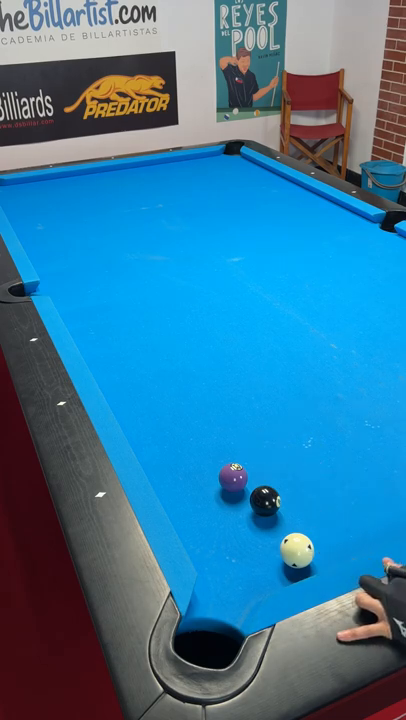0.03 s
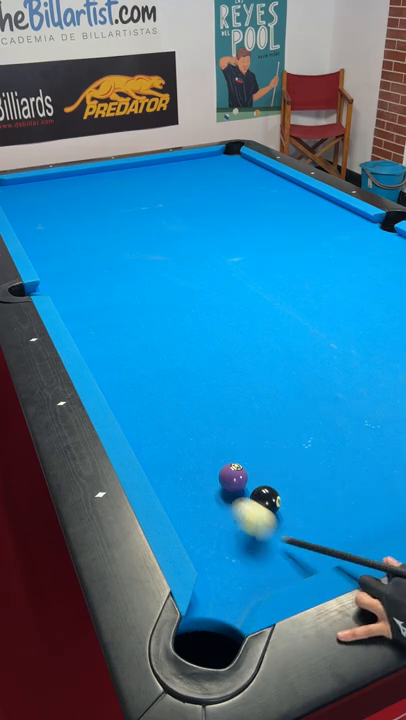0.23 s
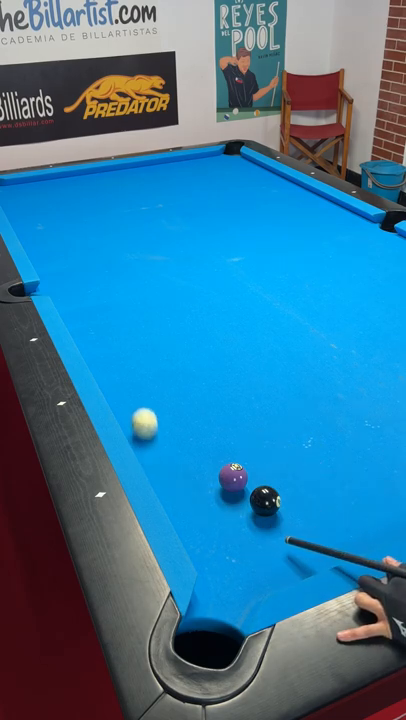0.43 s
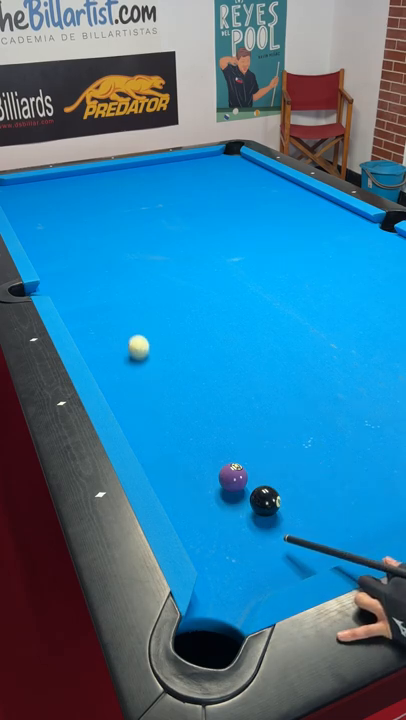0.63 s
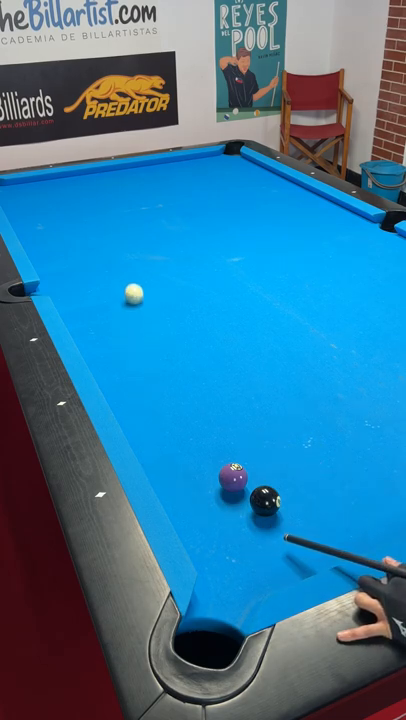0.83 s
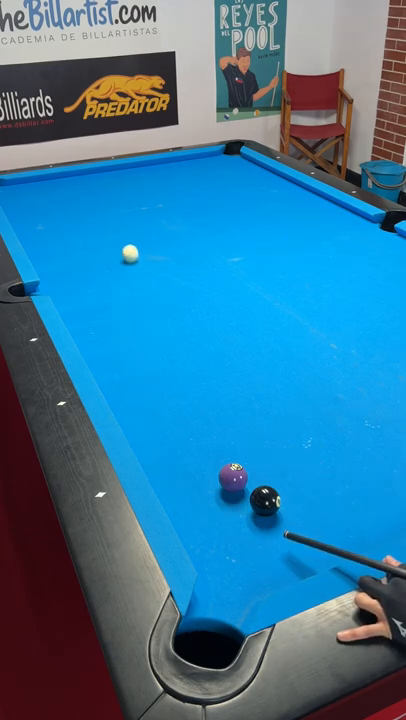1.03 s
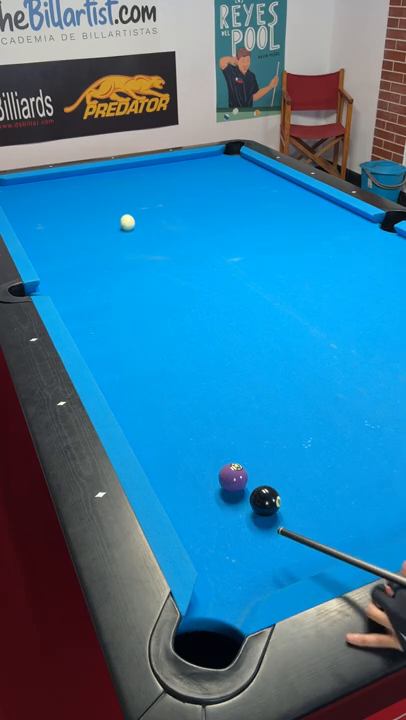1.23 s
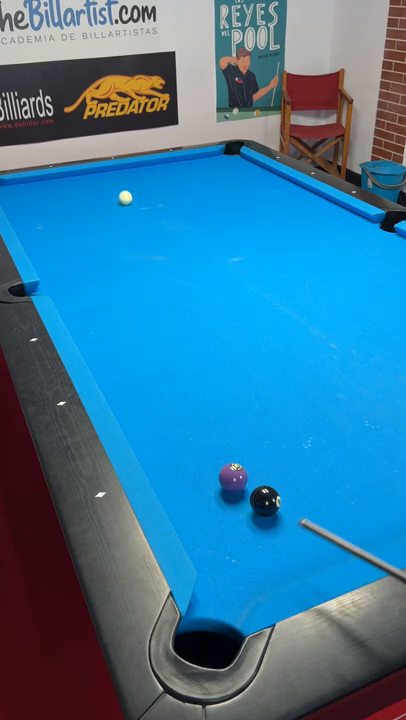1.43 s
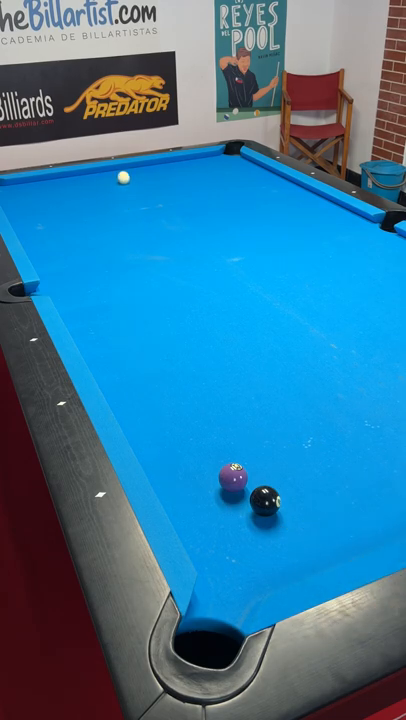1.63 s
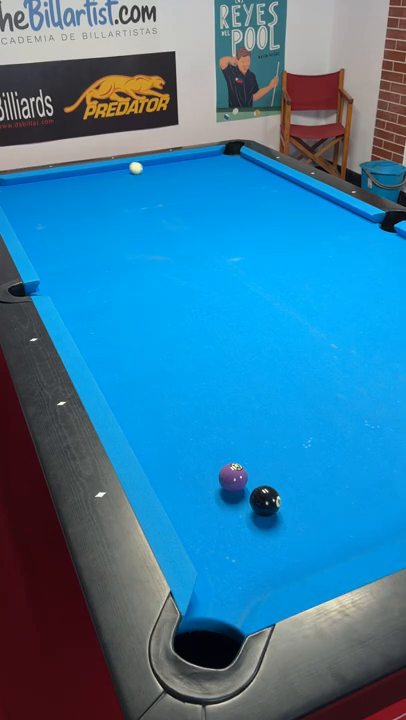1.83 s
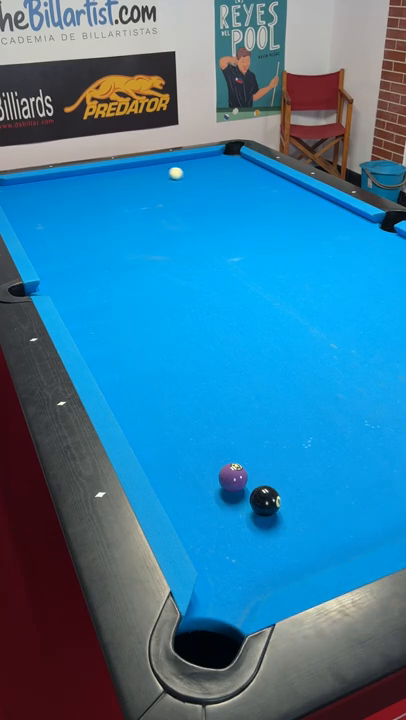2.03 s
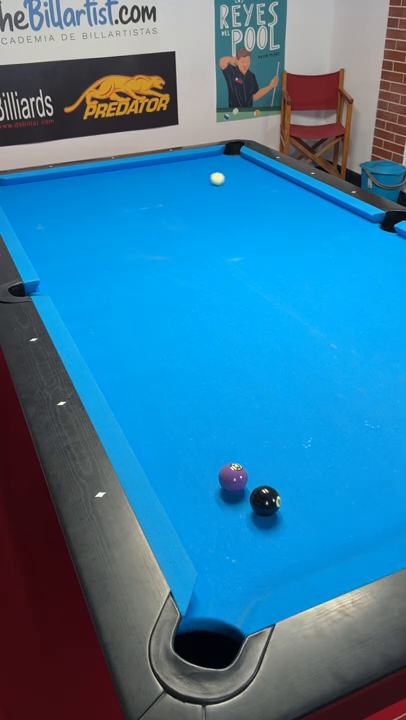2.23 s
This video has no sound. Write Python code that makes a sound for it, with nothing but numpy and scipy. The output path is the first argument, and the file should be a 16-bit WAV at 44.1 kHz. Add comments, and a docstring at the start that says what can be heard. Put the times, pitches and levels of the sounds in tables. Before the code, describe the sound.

A cue cracks sharply on a pool ball at about 0.25 seconds, ringing briefly in a small, quiet hall. The ball hops with quick, fading dull knocks until 0.6 seconds, then rolls with a low rumble. It thuds softly into far cushions at about 1.3 and 1.8 seconds. From around 1.1 seconds come a few small ticks, a faint sleeve rustle and the cue sliding back.

```python
"""A sleeve rustles faintly, then a cue cracks down on a ball: a jump shot at a pool table in a small hall.
The ball lands, hops on the ringing slate and rumbles over the cloth to thud softly into two far cushions.
Meanwhile the player draws the cue back with a rustle, a slide of the shaft and a few small ticks.
Heard from one microphone position, with a near echo, a short hall tail and quiet room air."""
import sys
import numpy as np
from scipy import signal
from scipy.fft import rfft, irfft, next_fast_len
from scipy.io import wavfile
from scipy.ndimage import map_coordinates

SR = 44100
rng = np.random.default_rng(int(sys.argv[2]) if len(sys.argv) > 2 else 0)


def put_to_file(sound):
    """Save the sound as 16-bit audio at rate SR, in the file named by the first command-line argument."""
    columns = np.atleast_2d(sound).T  # one column per channel
    safe = np.clip(columns, -1, 1)
    whole_steps = np.round(safe * 32767)
    wavfile.write(sys.argv[1], SR, whole_steps.astype(np.int16))


N = 101429
T = np.arange(N) / SR
STRIKE_S = .2418
RING_SAMPLES = 32768
# modes of cue and ball (frequency [Hz], level [dB], t60 [s])
CUE_MODES = [(385.9, -30.5, .15), (584.9, -18.5, 0.14), (809.84, -19, .27), (1013.6, -10, 0.066),
             (1203.6, -20, .15), (1307.8, -27.5, .12), (1490, -29.5, .08), (1780, -17, 0.057),
             (1950, -37.5, .08), (2259.3, -21, .065), (2923.2, -17.5, 0.031), (3535, -32.5, .04),
             (3938.6, -27.5, 0.049), (4570, -38, 0.031), (5127.4, -37, 0.058)]


def amp(db):
    """Decibels to gain."""
    return 10 ** (np.asarray(db) / 20)


def unit(x):
    """Scale to rms 1."""
    return x / np.sqrt(np.mean(x ** 2) + 1e-20)


def along(points, hz):
    """Read (frequency [Hz], value) points on a log frequency axis."""
    freqs, values = np.transpose(points)
    return np.interp(np.log(hz + 1), np.log(freqs + 1), values)


def level(points):
    """Gain along a (time [s], level [dB]) curve."""
    return amp(np.interp(T, *np.transpose(points)))


def wobble(per_s):
    """A smooth curve through per_s random values a second."""
    knots = rng.standard_normal(int(N * per_s / SR) + 4)
    return map_coordinates(knots, [T * per_s / SR], mode="nearest")


def filtered(x, gain):
    """Filter x by a gain over frequency."""
    size = next_fast_len(N + 8192)
    return irfft(rfft(x, size) * gain(np.fft.rfftfreq(size, 1 / SR)), size)[:N]


def noise(gain):
    """Coloured noise of rms 1."""
    return unit(filtered(rng.standard_normal(N), gain))


def rush(spectrum):
    """Noise of rms 1 shaped by (frequency [Hz], level [dB]) points."""
    return noise(lambda hz: amp(along(spectrum, hz)))


def fade(t60, t=T):
    """Exponential decay, 60 dB in t60 seconds."""
    return np.exp(-np.log(1000) * t / np.maximum(t60, 1e-4))


def fade_by_band(x, t60s):
    """Each frequency of x dies at its own speed."""
    hz, t, bands = signal.stft(x, SR, nperseg=512)
    return signal.istft(bands * fade(along(t60s, hz)[:, None], t), SR, nperseg=512)[1][:N]


def rise(seconds):
    """Soft onset with this time constant."""
    return 1 - np.exp(-T / max(seconds, 1e-5))


def at(s, x):
    """Delay x by s seconds."""
    return np.pad(x, (max(round(s * SR), 0), 0))[:N]


def ring(modes, scatter_db, swell_cycles=1.2):
    """Damped modes that take a moment to build up, a little different at each blow."""
    t = T[:RING_SAMPLES]
    out = np.zeros(N)
    for k, (hz, db, t60) in enumerate(modes):
        gain = (-1) ** k * amp(db + scatter_db * rng.standard_normal())
        swell = 1 - np.exp(-t * hz / swell_cycles)
        out[:RING_SAMPLES] += gain * swell * fade(t60, t) * np.sin(2 * np.pi * hz * t)
    return out


def room_air():
    """The quiet, steady air of the hall."""
    # room tone (frequency [Hz], level [dB])
    spectrum = [(25, 0), (70, -1.5), (180, -7.5), (500, -11.5), (1000, -19), (2000, -23.5), (6000, -25.5),
                (15500, -30.5)]
    return amp(-73.5) * rush(spectrum)


def sleeve_and_glove():
    """Sleeve and glove rustle with the stroke and as the player stands up."""
    # movement of each fabric (time [s], level [dB])
    sleeve_levels = [(0, -85), (.13, -90), (.19, -72), (.25, -74), (.6, -100), (1.0, -91), (1.19, -76.5),
                     (1.28, -78.5), (1.4, -78.5), (1.52, -75.5), (1.58, -76), (1.66, -74), (1.76, -75.5),
                     (1.95, -82), (2.3, -86.5)]
    glove_levels = [(.9, -100), (1.2, -86.5), (1.42, -84), (1.55, -80), (1.66, -83.5), (1.78, -97),
                    (2.1, -96.5)]
    # soft cloth and the glove's brighter swish (frequency [Hz], level [dB])
    cloth = [(100, -9.5), (500, -1.5), (1400, 0), (2500, -4.5), (6000, -7.5), (12000, -14), (16000, -15)]
    swish = [(1500, -28), (4000, -5), (7000, 0), (12500, -0.5), (16000, -8)]
    return sum(level(curve) * amp(1.5 * wobble(per_s=30)) * rush(colour)
               for curve, colour in [(sleeve_levels, cloth), (glove_levels, swish)])


def cue_strike():
    """The hard tip cracks on the ball; cue and table ring."""
    # crack of the tip and the table's shaken wooden body (frequency [Hz], level [dB])
    crack_spectrum = [(40, -15.5), (150, -9), (500, -4.5), (1200, 0.5), (3000, -3.5), (4500, -12),
                      (6500, -26), (10000, -33.5), (15000, -37)]
    wood_spectrum = [(40, -15.5), (150, 1.5), (230, -5.5), (330, -3.5), (650, 2.5), (880, -4.5), (1150, 2),
                     (1400, -4), (1700, -14), (3000, -22.5), (5000, -36), (7000, -49), (15000, -54.5)]
    crack = amp(-17.5) * rush(crack_spectrum) * fade(t60=.025)
    wood = amp(-23) * rush(wood_spectrum) * fade(t60=.3676) * rise(.0021)
    return at(STRIKE_S, (ring(CUE_MODES, scatter_db=1.59) + crack + wood) * rise(.0004))


def rolling():
    """The moving ball makes the slate rumble and drone at its lowest mode."""
    # rumble of the roll, and the drone, loudest during the hops (time [s], level [dB])
    rumble_levels = [(.25, -90.5), (.5, -58), (.7, -58), (.9, -64.5), (1.25, -64.5), (1.7, -65.5),
                     (2.05, -64), (2.3, -69)]
    drone_levels = [(.24, -73), (.26, -52.5), (.30, -44.5), (.34, -47), (.5, -44), (.57, -52), (.615, -66),
                    (1.05, -66), (1.6, -72.5), (2.05, -61.5), (2.3, -72)]
    # ball rolling on cloth over slate (frequency [Hz], level [dB])
    rumble_spectrum = [(25, -14), (50, -10), (80, 0), (100, -12.5), (140, -1.5), (220, -10.5), (320, -17.5),
                       (500, -27.5), (900, -44), (3000, -67.5)]
    drone_hz, wander_rad, waver_db = 72.26, .55, 3
    phase = 2 * np.pi * drone_hz * T + wander_rad * wobble(per_s=7)
    drone = level(drone_levels) * unit(np.sin(phase)) * amp(waver_db * wobble(per_s=9))
    rumble = level(rumble_levels) * rush(rumble_spectrum)
    return (rumble + drone) * (T > STRIKE_S)


def knock(blow_db):
    """Dull knock of ball on cloth; a weaker blow has less treble."""
    # contact noise (frequency [Hz], level [dB])
    spectrum = [(40, -17.5), (120, -4.5), (250, -6), (500, 3.5), (900, -6), (1500, -11.5), (2200, -29),
                (5000, -47), (12000, -70.5)]
    contact_hz, db_per_octave = 1700, 4
    hz = np.fft.rfftfreq(RING_SAMPLES, 1 / SR)
    cutoff_hz = contact_hz * 2 ** (blow_db / db_per_octave)
    lowpass = 1 / np.sqrt(1 + (hz / cutoff_hz) ** 4)
    burst = unit(irfft(rfft(rng.standard_normal(RING_SAMPLES)) * amp(along(spectrum, hz)) * lowpass))
    return amp(-31) * np.pad(burst, (0, N - RING_SAMPLES)) * fade(t60=.14)


def hops():
    """The ball is driven into the slate, lands and hops until it settles."""
    # the ball meets the slate (time [s], level [dB])
    landings = [(.246, 5.5), (.297, -10), (.342, 2.5), (.374, -0.5), (.402, -3), (.449, -5), (.488, -8.5),
                (.515, -12.5), (.562, -15.5)]
    # modes of the slate bed (frequency [Hz], level [dB], t60 [s])
    slate_modes = [(209.06, -39, 0.22), (235.8, -41.5, .46), (310.7, -40, .28), (331.89, -41, .28),
                   (456.5, -43, 0.43), (564, -42, 0.21), (643, -45.5, 0.22)]
    onset = rise(.0034)
    return sum(at(s, amp(db) * onset * (ring(slate_modes, scatter_db=4) + knock(db)))
               for s, db in landings)


def ticks():
    """A bright tick of the ball hitting the slate, then small ticks and scuffs of handling the cue."""
    # ticks and scuffs (time [s], level [dB], centre [Hz], width [octaves], t60 [s])
    contacts = [(.2562, -47.5, 6600, .7, .008), (1.1002, -48.5, 11480, 0.206, 0.0037),
                (1.178, -71.5, 2700, .6, 0.094), (1.199, -58.5, 6680, 0.37, 0.0057),
                (1.199, -54, 464, 0.93, 0.0256), (1.797, -57, 1001, 0.733, 0.021)]
    out = np.zeros(N)
    for s, db, centre_hz, width, t60 in contacts:
        band = noise(lambda hz: np.exp(-.5 * (np.log2((hz + 1) / centre_hz) / width) ** 2))
        out += at(s, amp(db) * fade(t60) * band)
    return out


def cue_slide(width_hz=64, dull_hz=1605.7):
    """Friction on the shaft stirs the cue's lower modes."""
    # the shaft slides back over the bridge hand (time [s], level [dB])
    slide_levels = [(1.0, -100), (1.4, -88), (1.51, -75.5), (1.64, -82.5), (1.74, -81.5), (1.95, -93)]

    def shaft(hz):
        peaks = sum(amp(db / 2) / (1 + (2 * (hz - mode_hz) / width_hz) ** 2)
                    for mode_hz, db, _ in CUE_MODES)
        return peaks / (1 + (hz / dull_hz) ** 2)
    return level(slide_levels) * noise(shaft)


def cushions():
    """Far rubber gives softly; table and hall boom, the bass longest; a duller bump follows."""
    # the ball meets a cushion (time [s], level [dB], rise [s], dull above [Hz])
    hits = [(1.291, -41, 0.0415, 387), (1.830, -42, 0.0079, 524.5)]
    # colour of the boom (frequency [Hz], level [dB])
    spectrum = [(30, -23), (60, -11), (85, 3.5), (140, 0), (300, 1.5), (450, 1), (900, -5.5), (2000, 10)]
    # decay of the boom (frequency [Hz], t60 [s])
    decay = [(80, 0.98), (200, 0.647), (400, 0.3655), (1000, 0.23)]

    def boom(dull_hz):
        return noise(lambda hz: amp(along(spectrum, hz)) / np.sqrt(1 + (hz / dull_hz) ** 8))
    out = np.zeros(N)
    for s, db, rise_s, dull_hz in hits:
        out += at(s, amp(db) * rise(rise_s) * fade_by_band(boom(dull_hz), decay))
        # the rebounding ball settles back on the slate
        out += at(s + .1, amp(db - 8) * rise(.0214) * fade(t60=.285) * boom(dull_hz=275.7))
    return out


def hall(x):
    """What the small hall returns to the microphone: an echo off a near surface and a diffuse tail."""
    # reverberation time (frequency [Hz], t60 [s])
    decay = [(100, .65), (400, 0.39), (1000, 0.34), (2000, .41), (4000, 0.45), (8000, 0.29), (14000, 0.11)]
    # colour of the tail (frequency [Hz], level [dB])
    colour = [(100, -1), (400, 4), (1000, 2), (2000, -11), (4000, -10), (8000, -2.5), (14000, 2.5)]
    tail = fade_by_band(rng.standard_normal(N), decay)
    tail = filtered(tail / np.linalg.norm(tail), lambda hz: amp(along(colour, hz))) * rise(.007976)
    echo = amp(-17.5) * at(.009, x)
    return echo + amp(-9.5) * signal.fftconvolve(x, tail)[:N]


def scene():
    """The table in mono; strike, hops and ticks also sound in the hall."""
    strike = cue_strike()
    taps = hops() + ticks()
    reverb = hall(strike + amp(-5.5) * taps)
    mix = strike + taps + reverb + cushions() + rolling() + sleeve_and_glove() + cue_slide() + room_air()
    return mix[None]


def record(dry):
    """The recorder keeps nothing above its band limit."""
    top_hz = 15750
    return filtered(dry[0], lambda hz: 1 / np.sqrt(1 + (hz / top_hz) ** 300))[None]


dry = scene()
out = record(dry)
put_to_file(out)
```